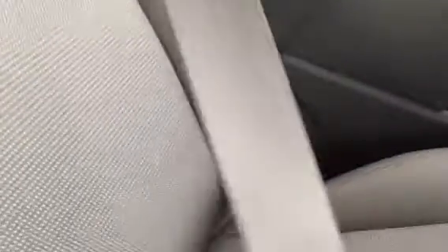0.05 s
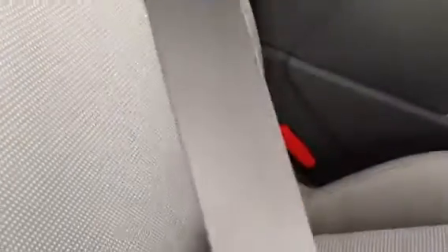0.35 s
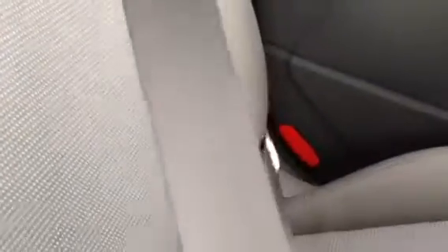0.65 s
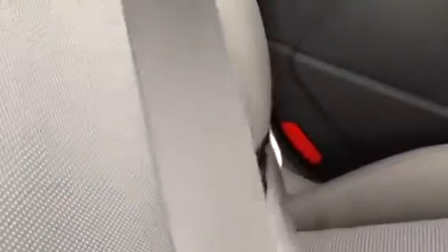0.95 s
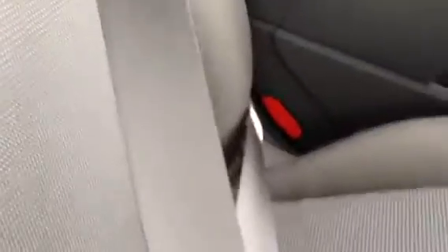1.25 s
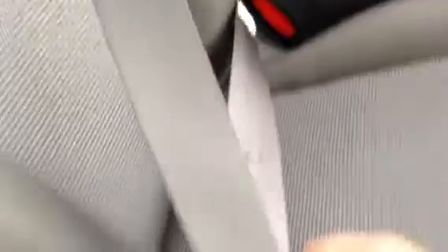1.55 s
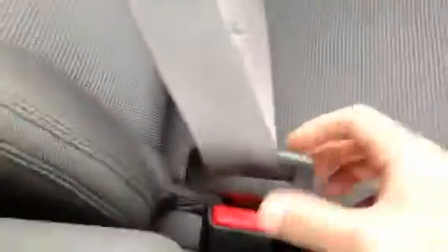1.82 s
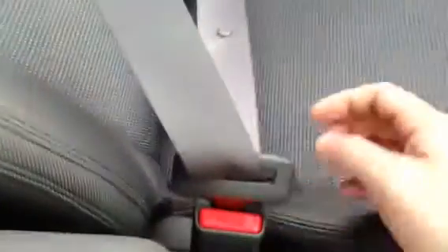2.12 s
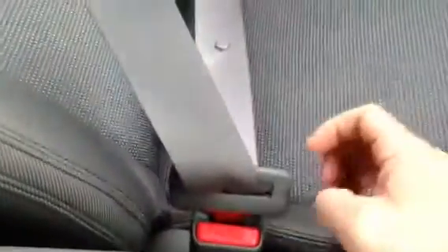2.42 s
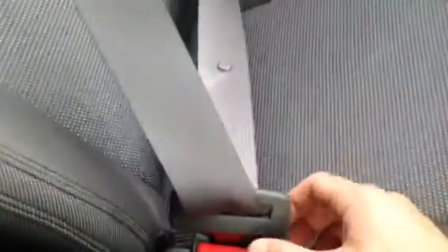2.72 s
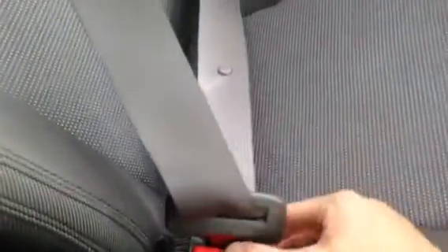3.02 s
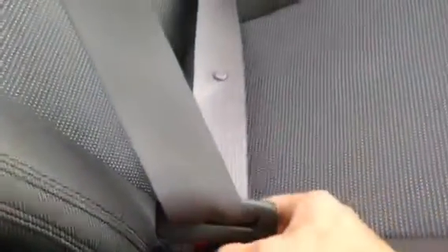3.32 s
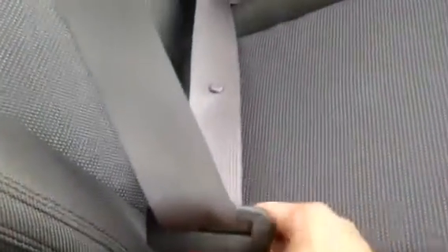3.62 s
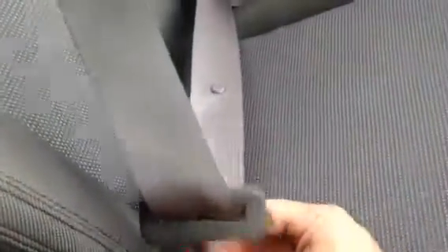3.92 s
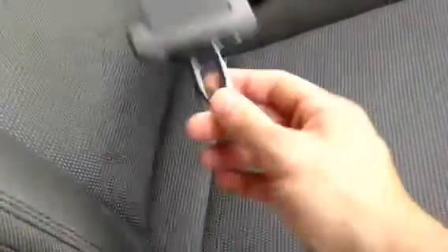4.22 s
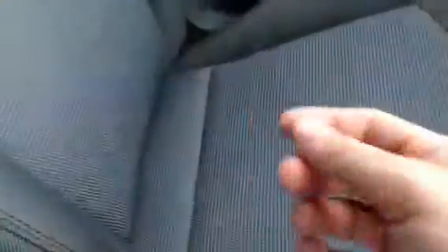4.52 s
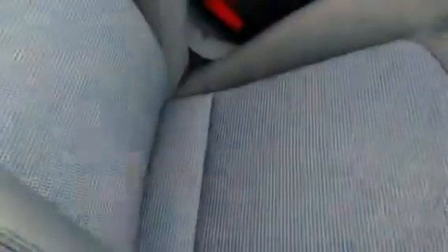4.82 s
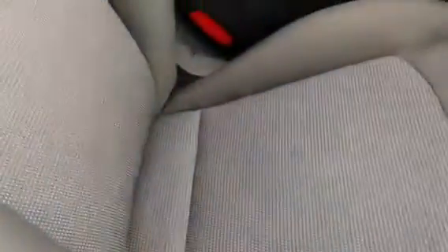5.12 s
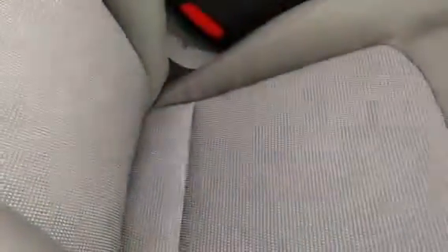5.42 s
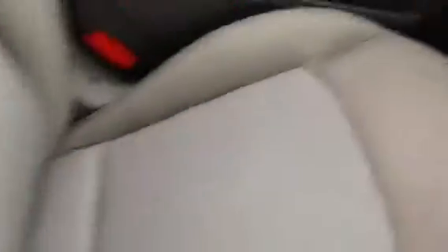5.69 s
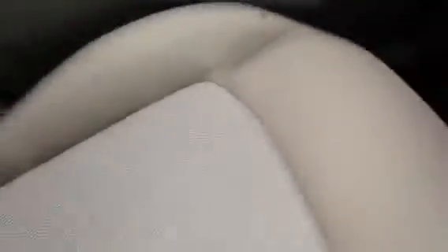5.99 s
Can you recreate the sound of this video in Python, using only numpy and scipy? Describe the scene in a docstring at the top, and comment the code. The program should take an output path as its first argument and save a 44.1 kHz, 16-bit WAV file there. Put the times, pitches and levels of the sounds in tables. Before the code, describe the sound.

A seat belt jerks with a muffled stutter, followed at once by a sharp buckle click. Soft bumps on the seat cushion and small metal ticks lead to a second bright snap. The metal tongue scrapes and clinks free, the webbing slides back, and two quick, boomy knocks hit the plastic trim. Light rustling ends it. Everything is close, in a quiet car cabin with faint hum and microphone handling rumble.

```python
"""A seat belt handled in a parked car, close to a hand-held microphone, over low cabin hum.
The belt drags with a dull stick-slip judder and the buckle's sprung latch snaps (1.1 s).
A hand thuds on the seat; the buckle is fingered and snaps again (3.5 s). The steel tongue scrapes out
and is let go. The belt rasps back (4.5 s) and the tongue knocks twice on the trim panel, which booms.
Cloth rustles and a few faint ticks follow."""
import sys
import numpy as np
from scipy import signal
from scipy.fft import rfft, irfft
from scipy.io import wavfile

SR = 44100
rng = np.random.default_rng(int(sys.argv[2]) if len(sys.argv) > 2 else 0)


def wav_out(sig):
    """Save sig, one row per channel (or a flat mono array), as 16-bit PCM at SR to the path in sys.argv[1]."""
    wavfile.write(sys.argv[1], SR, np.round(np.clip(np.atleast_2d(sig).T, -1, 1) * 32767).astype(np.int16))


N = 266981

# cabin air, hand sway on the microphone: time_s, level_db
AIR_LEVELS = [(0, -51), (2.4, -52.5), (4.3, -49), (6.05, -51.5)]
SWAY_LEVELS = [(0, -70), (0.6, -64.5), (1.15, -49.5), (1.6, -53), (2.5, -47), (3.7, -49), (4.4, -48),
               (4.95, -44), (5.27, -65), (5.5, -50.5), (6.05, -60)]
# tongue touching buckle and trim: time_s, level_db, bright_hz, body_db
TONGUE_TICKS = [(0.652, -27.5, 5090, -7), (1.431, -43, 3430, 2), (1.549, -35, 4340, -0.5),
                (1.579, -38.5, 5530, -12), (3.256, -31, 3920, 2.5), (3.2892, -37, 5830, -16),
                (3.688, -30.5, 5020, 0), (3.9267, -17, 5890, -5.5), (4.0427, -23, 4350, -8.5),
                (4.4532, -15, 5070, -16), (4.4547, -7.5, 4110, -13), (5.651, -44, 2850, 12.5),
                (5.774, -45.5, 3570, 17.5), (6.005, -39, 2700, 6)]
# tongue scraping in its slot: start_s, length_s, level_db
TONGUE_SCRAPES = [(3.237, .01, -39.5), (3.27, .028, -34), (3.668, .036, -37.5), (3.921, .013, -26.5)]
# pulls on the belt: start_s, length_s, level_db
BELT_PULLS = [(0.711, 0.055, -47.5), (0.885, 0.19, -20), (1.114, .088, -34.5), (1.287, 0.023, -39),
              (1.829, 0.076, -43), (2.215, .065, -48), (2.374, 0.13, -48)]
# belt jerking free: time_s, level_db, cutoff_hz
BELT_JOLTS = [(0.862, -23, 400), (0.91, -17.5, 450), (0.927, -11, 900), (0.938, -18, 910),
              (0.974, -3, 3000), (0.9793, -5, 403), (1.007, -7.5, 450), (1.04, -13, 750), (1.062, -13, 800),
              (1.12, -20.5, 600), (1.305, -29, 250), (2.483, -29.5, 450), (6.005, -32.5, 700)]
# hand on the seat, plus the low knock under the buckle's snap at 3.505 s: time_s, level_db, pitch_hz
SEAT_THUDS = [(0.711, -35.5, 101), (0.801, -36, 129.5), (0.886, -21, 149), (1.883, -26.5, 99),
              (2.243, -31, 189), (2.408, -26, 110), (2.444, -27.5, 117.8), (2.484, -25.5, 137),
              (2.617, -29, 113), (3.253, -31.5, 131), (3.377, -26, 112.4), (3.4, -24, 87.5),
              (3.505, -30, 142), (4.199, -30, 129), (4.515, -23.5, 104)]
# cloth strokes: start_s, length_s, level_db
CLOTH_SLIDES = [(0.716, .04, -60), (0.821, 0.033, -56), (4.386, 0.1, -54.5), (4.548, 0.087, -52.5),
                (4.809, 0.016, -47.5), (4.904, 0.027, -57), (5.385, 0.22, -55.5), (5.726, 0.17, -58)]
# latch hitting its stops: time_s, level_db, body_db, bright_hz
LATCH_SNAPS = [(1.0912, -14, -6.5, 2700), (1.109, -15.5, 2, 4340), (1.1124, -4.5, -8, 5650),
               (1.117, -7.5, -6.5, 4300), (3.494, -24, -14, 5700), (3.4992, -3.5, -16, 8500),
               (3.503, -14, 1.5, 2200), (3.5051, -15, -2.5, 1870), (3.5098, -11.5, -10, 7400)]
# buckle and tongue modes: pitch_hz, level_db, t60_s
STEEL_MODES = [(1590, -7.5, 0.063), (1950, -3.5, 0.08), (2240, -3, .05), (2710, -6, .055), (2800, -9, 0.05),
               (3395, -5.5, 0.039), (4450, -2, 0.037), (4570, -0.5, 0.035), (4740, -32, 0.35),
               (5130, -2, 0.038), (5525, 4.5, 0.039), (5470, -8.5, 0.052), (6260, -9, 0.055),
               (7400, -3, 0.057), (8950, -8, .05), (9250, -5, 0.055)]
# belt running over its guide: start_s, length_s, rasp_db, hiss_db
BELT_RUNS = [(4.459, 0.037, -36.5, -65), (4.512, 0.028, -33.5, -43)]
# tongue hitting the trim: time_s, clack_db, boom_db, cutoff_hz, pitch_ratio
TRIM_KNOCKS = [(4.7142, -8.5, -7.5, 550, 1), (4.7203, -18, -15.5, 600, 1.3), (4.8424, -12, -2.5, 169, 1.02),
               (4.8496, -18, -10.5, 119, 1.2)]
# trim panel modes: pitch_hz, level_db, t60_s
TRIM_MODES = [(142.5, 0, 0.16), (177.7, -4, 0.089), (278.6, -6, 0.058), (391, -13, 0.049), (446, -13, 0.11),
              (565, -15, 0.068), (870, -5.5, 0.038), (1240, -30, 0.069)]
# boom off roof and windows: delay_s, level_db
BOOM_ECHOES = [(0.0162, -13.5), (0.036, -16.5)]
# source spectra: freq_hz, relative_db
AIR_SPECTRUM = [(12, -47), (20, -27), (35, -12.5), (53, -1.5), (120, -7), (301, -21.5), (422, -21.5),
                (542, -21.5), (590, -26), (976, -22), (1760, -23.5), (2530, -33.5), (6360, -41),
                (14700, -46), (16000, -57)]
SWAY_SPECTRUM = [(15, -37.5), (25, -20), (65, 0), (97, -6), (128, -6), (221, -14), (400, -25.5), (520, -54),
                 (880, -120)]
TICK_SPECTRUM = [(250, -55), (500, 10), (850, 10.5), (1600, 4.5), (2700, -2), (4500, 2.5), (7000, -4),
                 (10000, -6.5), (15000, -21)]
DRAG_SPECTRUM = [(21, -45.5), (35, -22.5), (97, 4), (194, -2), (236, 3.5), (309, -5.5), (404, -6),
                 (595, -10), (680, -17.5), (1260, -30.5), (1890, -42), (2570, -55.5), (3500, -68),
                 (4550, -92.5), (7700, -120)]
CLOTH_SPECTRUM = [(880, -33.5), (1500, -14), (1640, -1), (2660, -13.5), (5220, -12.5), (14600, -25.5),
                  (15500, -25), (16000, -42)]
SNAP_SPECTRUM = [(150, -17), (400, -9.5), (800, -7.5), (1250, -3.5), (1900, 1), (2700, -8), (3400, -5),
                 (4300, -4.5), (6000, -8.5), (8500, -7), (11500, -11), (15500, -22)]
RASP_SPECTRUM = [(59, -38), (100, -16), (330, -5.5), (381, -1), (452, -2), (858, -19), (989, -10.5),
                 (1370, -26), (2100, -29), (3000, -66), (3900, -72), (6600, -120)]
CLACK_SPECTRUM = [(240, -19), (400, -5.5), (994, -14), (1270, -12), (1440, -20), (1790, -15.5), (2590, -25),
                  (3690, -24.5), (9470, -34.5), (15000, -49), (16000, -73)]


def from_db(db):
    """Decibels to gain."""
    return 10 ** (np.asarray(db) / 20)


def add(out, time_s, sound):
    """Mix a sound in at time_s."""
    at = int(time_s * SR)
    out[at:at + len(sound)] += sound[:N - at]


def level(rows, fade_s=0.008):
    """Gain along a (time_s, level_db) curve, silent outside it."""
    time_s, db = np.transpose(rows)
    t = np.arange(N) / SR
    gate = np.interp(t, [time_s[0] - fade_s, time_s[0], time_s[-1], time_s[-1] + fade_s], [0, 1, 1, 0])
    return from_db(np.interp(t, time_s, db)) * gate


def stroke(start_s, length_s, attack_s, t60_s):
    """Envelope of one movement: attack, hold, release."""
    t = np.arange(N) / SR - start_s
    return np.clip(t / attack_s, 0, 1) * from_db(-60 * np.clip((t - length_s) / t60_s, 0, 10))


def cut(x, hz, kind, order=2):
    """Butterworth low-, high- or band-pass."""
    return signal.sosfilt(signal.butter(order, np.clip(hz, 10, .45 * SR), kind, fs=SR, output="sos"), x)


def resonance(x, hz, width_hz):
    """Unity-gain band round hz."""
    return cut(x, [hz - width_hz / 2, hz + width_hz / 2], "band", order=1)


def colour(x, spectrum, size=8192):
    """Minimum-phase filter with the given spectrum and unit power gain."""
    hz, db = np.transpose(spectrum)
    bins_hz = np.arange(size // 2 + 1) * SR / size
    gain = from_db(np.interp(np.log(bins_hz + 1), np.log(hz), db))
    cepstrum = irfft(np.log(gain))
    cepstrum[1:size // 2] *= 2
    cepstrum[size // 2 + 1:] = 0
    response = irfft(np.exp(rfft(cepstrum)))
    return signal.fftconvolve(x, response / np.linalg.norm(response))[:len(x)]


def noise(spectrum):
    """Coloured noise of unit power."""
    return colour(rng.standard_normal(N), spectrum)


def ring(x, hz, t60_s):
    """One mode: a unit impulse starts a decaying unit sine."""
    r, w = from_db(-60 / (t60_s * SR)), 2 * np.pi * hz / SR
    return signal.lfilter([0, np.sin(w)], [1, -2 * r * np.cos(w), r * r], x + 1e-18)


def contact(crack_t60_s, tail_db, tail_t60_s, size=8192):
    """A blow: dense crack, then duller scatter round the padded cabin."""
    t = np.arange(size) / SR
    crack, scatter = rng.standard_normal((2, size))
    build_up = 1 - np.exp(-t / 0.00036)  # vibration spreads through the part
    tail = cut(scatter, 5600, "low", order=1) * from_db(tail_db - 60 * t / tail_t60_s)
    return build_up * (crack * from_db(-60 * t / crack_t60_s) + tail)


def housing(x, body_db, split_hz):
    """Low body of a blow that reaches the plastic housing, relative to its treble."""
    return cut(x, split_hz, "high") - from_db(body_db) * cut(x, split_hz, "low")


def cabin():
    """Faint steady air; rumble of the hand round the microphone."""
    air = level(AIR_LEVELS) * noise(AIR_SPECTRUM)
    sway = level(SWAY_LEVELS) * noise(SWAY_SPECTRUM)
    return air + from_db(1) * sway


def touch(bright_hz, body_db):
    """Short crack of steel on plastic, emphasised round bright_hz."""
    crack = housing(contact(crack_t60_s=0.0067, tail_db=-9, tail_t60_s=0.054), body_db, split_hz=2300)
    return cut(crack, 3.7 * bright_hz, "low") + from_db(-9.5) * resonance(crack, bright_hz, width_hz=2200)


def tongue(catches_per_s=290, jitter_share=0.25, spread_db=3.5):
    """A touch cracks and pings the steel plate; a scrape is an uneven run of tiny catches."""
    cracks, pings = np.zeros((2, N))
    for time_s, db, bright_hz, body_db in TONGUE_TICKS:
        add(cracks, time_s, from_db(db) * touch(bright_hz, body_db))
        add(pings, time_s, from_db(db) * ring(signal.unit_impulse(SR), bright_hz, t60_s=0.033))
    for start_s, length_s, db in TONGUE_SCRAPES:
        for k in np.arange(length_s * catches_per_s):
            time_s = start_s + rng.normal(k, jitter_share) / catches_per_s
            add(cracks, time_s, from_db(rng.normal(db, spread_db)) * touch(bright_hz=5000, body_db=-10))
    return from_db(-5.5) * colour(cracks, TICK_SPECTRUM) + from_db(-15) * pings


def pull(start_s, length_s, db, swell_db=15, ease_db=10):
    """Envelope of one pull: swells, eases, stops."""
    peak_s = start_s + 0.4 * length_s
    return level([(start_s, db - swell_db), (peak_s, db), (start_s + length_s, db - ease_db)])


def belt_drag(slips_per_s=1500):
    """Stick-slip: a few big jolts among many small slips, heard through padding."""
    slips = (rng.random(N) < slips_per_s / SR) * rng.choice([-1, 1], N)
    slips = slips / np.std(slips)
    speed = sum(pull(*row) for row in BELT_PULLS)
    jolts = np.zeros(N)
    for time_s, db, cutoff_hz in BELT_JOLTS:
        add(jolts, time_s, from_db(db) * cut(signal.unit_impulse(SR), cutoff_hz, "low", order=1))
        speed += from_db(db - 10) * stroke(time_s, length_s=0.0051, attack_s=0.00092, t60_s=0.019)
    force = from_db(-2.5) * slips * speed + from_db(16.5) * jolts
    body = colour(force, DRAG_SPECTRUM)
    return (body + from_db(-1) * resonance(body, hz=440, width_hz=98)
            + from_db(-3.5) * resonance(body, hz=656, width_hz=230))


def seat(nudges_per_s=3, nudge_db=-45.5, nudge_hz=125):
    """Hand thuds, the low knock under the second snap and faint random nudges: the cushion damps them, the
    frame adds a hollow note."""
    thuds, tap = np.zeros(N), signal.unit_impulse(SR)
    nudge_times_s = np.flatnonzero(rng.random(N) < nudges_per_s / SR) / SR
    nudges = [(time_s, nudge_db, nudge_hz) for time_s in nudge_times_s]
    frame = from_db(-9) * ring(tap, hz=257.5, t60_s=0.038)
    for time_s, db, hz in SEAT_THUDS + nudges:
        add(thuds, time_s, from_db(db) * (ring(tap, hz, t60_s=0.051) + frame))
    return from_db(3.5) * cut(cut(thuds, 376, "low", order=4), 64, "high")


def cloth():
    """Webbing and sleeve slide with a soft hiss; long strokes swell and fade slowly."""
    speed = sum(from_db(db) * stroke(start_s, length_s, attack_s=0.42 * length_s, t60_s=4 * length_s)
                for start_s, length_s, db in CLOTH_SLIDES)
    return from_db(-2.5) * noise(CLOTH_SPECTRUM) * speed


def buckle(falloff_db_per_octave=10):
    """The sprung latch hits several stops within milliseconds; each favours modes near one pitch."""
    blows, rings = np.zeros((2, N))
    tap = signal.unit_impulse(SR // 5)
    for time_s, db, body_db, bright_hz in LATCH_SNAPS:
        crack = contact(crack_t60_s=0.019, tail_db=-9, tail_t60_s=0.072)
        blow = from_db(db) * housing(crack, body_db, split_hz=4640)
        add(blows, time_s, blow + from_db(2) * resonance(blow, bright_hz, width_hz=670))
        for hz, mode_db, t60_s in STEEL_MODES:
            gain = from_db(db + mode_db - falloff_db_per_octave * abs(np.log2(hz / bright_hz)))
            add(rings, time_s, rng.choice([-1, 1]) * gain * ring(tap, hz, t60_s))
    return from_db(-5) * colour(blows, SNAP_SPECTRUM) + from_db(-19) * rings


def belt_rewind():
    """The freed belt rasps over its guide; the webbing hisses as it gathers speed."""
    rasp, hiss = noise(RASP_SPECTRUM), from_db(-2.5) * noise(CLOTH_SPECTRUM)
    out = np.zeros(N)
    for start_s, length_s, rasp_db, hiss_db in BELT_RUNS:
        envelope = stroke(start_s, length_s, attack_s=0.004, t60_s=0.13)
        out += envelope * (from_db(rasp_db) * rasp + from_db(hiss_db) * hiss)
    return out


def trim():
    """The swinging tongue clacks on the panel, which booms into the cabin."""
    clacks, boom = np.zeros((2, N))
    for time_s, clack_db, boom_db, cutoff_hz, pitch_ratio in TRIM_KNOCKS:
        add(clacks, time_s, from_db(clack_db) * contact(crack_t60_s=0.02, tail_db=-10, tail_t60_s=0.072))
        push = from_db(boom_db) * cut(signal.unit_impulse(SR), cutoff_hz, "low", order=1)
        for hz, db, t60_s in TRIM_MODES:
            add(boom, time_s, from_db(db) * ring(push, hz * pitch_ratio, t60_s))
    boom = cut(boom, 64, "high")
    out = from_db(-1) * colour(clacks, CLACK_SPECTRUM) + from_db(-1.5) * boom
    echo = cut(boom, 340, "low", order=1)  # dulled by upholstery
    for delay_s, db in BOOM_ECHOES:
        add(out, delay_s, from_db(db) * echo)
    return out


def scene():
    """All sources at one close microphone."""
    return (cabin() + tongue() + belt_drag() + seat() + cloth() + buckle() + belt_rewind() + trim())[None]


def record(dry):
    """Soft clip, then steep low-pass."""
    cutoff_hz = 15700
    rounded = 0.8 * np.tanh(dry / 0.77)
    return signal.sosfilt(signal.ellip(10, .2, 70, cutoff_hz, fs=SR, output="sos"), rounded)


dry = scene()
out = record(dry)
wav_out(out)
```